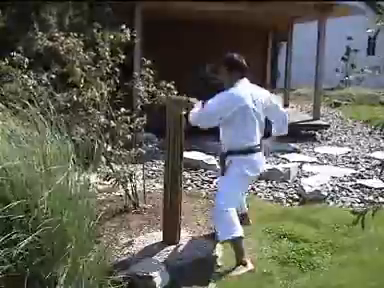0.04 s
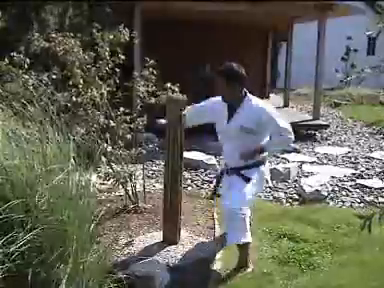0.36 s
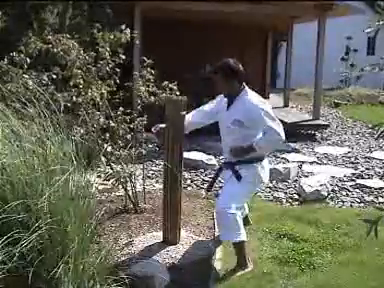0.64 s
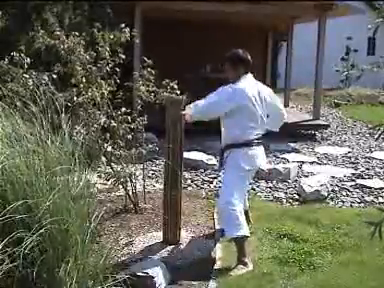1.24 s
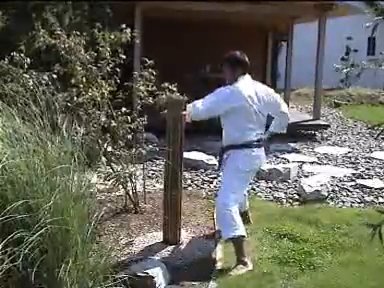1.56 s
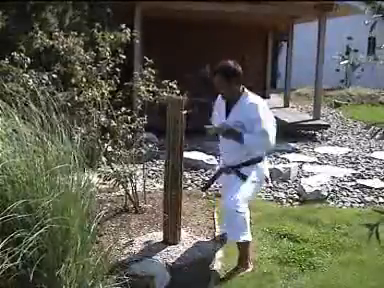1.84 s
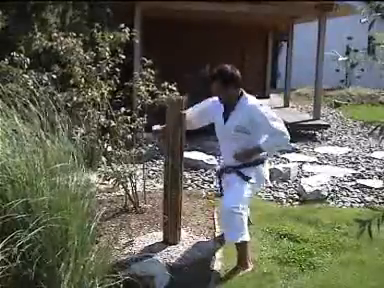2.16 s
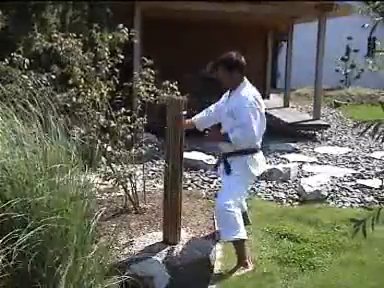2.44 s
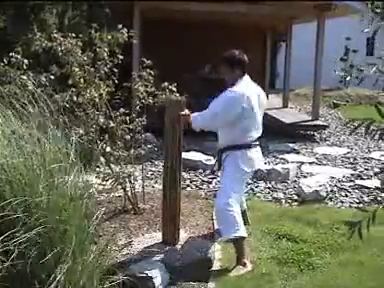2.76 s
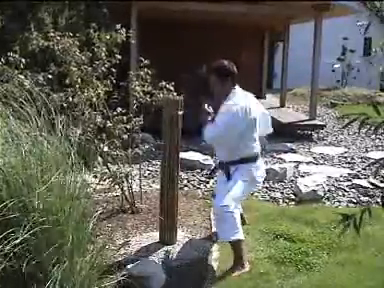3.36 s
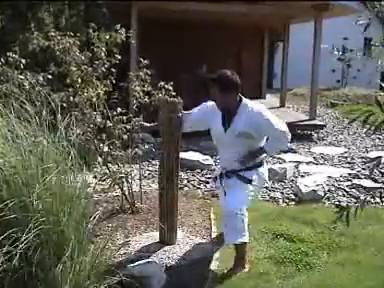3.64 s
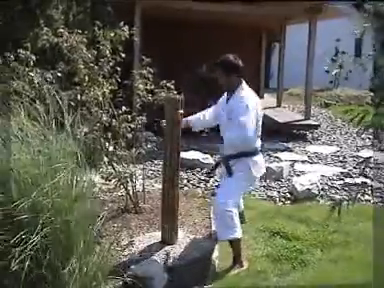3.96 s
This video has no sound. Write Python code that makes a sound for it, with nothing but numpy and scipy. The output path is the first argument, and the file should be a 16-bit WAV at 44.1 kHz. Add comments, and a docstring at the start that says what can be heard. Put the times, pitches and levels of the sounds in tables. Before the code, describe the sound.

A fist hits a wooden training post three times, each a sharp crack with a hollow knock, followed by rattling and clacking. Faint scuffs precede the blows, over a soft garden hush and slight wind on the microphone.

```python
"""A quiet garden, a small stereo camera on a wooden training post that a fist hits three times.
Each blow is a hard crack, hollow knocks of the post on its footing and a bright, crackling tail;
the post then rattles, clacks and snaps as it swings back. Feet and cloth scuff before each blow,
and light taps fall in the gaps. Behind it all lie a soft outdoor hush and a faint distant hum,
with a little wind on the microphone."""
import sys
import numpy as np
from scipy import signal
from scipy.fft import rfft, irfft
from scipy.io import wavfile
from scipy.ndimage import uniform_filter1d

SR = 44100
rng = np.random.default_rng(int(sys.argv[2]) if len(sys.argv) > 2 else 0)


def digitize_waveform(pressure):
    """Quantize a signal to 16-bit integers and store it at the path in sys.argv[1].

    Rows of a 2-D input are taken as channels; values are limited to [-1, 1].
    """
    field = np.atleast_2d(pressure).T
    bounded = np.clip(field, -1, 1)
    quanta = np.round(bounded * 32767).astype(np.int16)
    wavfile.write(sys.argv[1], SR, quanta)


N = 176400
TIME_S = np.arange(N) / SR
BIN_HZ = np.arange(N // 2 + 1) * SR / N

# spectrum of crackling wood: frequency_hz, relative_db
CRACKLE_SPECTRUM = [(30, -36.5), (300, -27), (550, -14.5), (1100, -13), (2000, -9), (3000, -4), (4200, 0.3),
                    (6000, -1), (9000, -4.5), (13300, -15), (14600, -33)]


def undb(db):
    """Decibels to gain."""
    return 10 ** (np.asarray(db) / 20)


def on_bins(points, column=1):
    """One column of a frequency table, read at every spectral line."""
    table = np.array(points, float)
    return np.interp(np.log(BIN_HZ + 1), np.log(table[:, 0]), table[:, column])


def octave_bump(hz, octaves):
    """Gain curve of one broad, steep-sided resonance, in dB."""
    away = np.log2((BIN_HZ + 1) / hz) / octaves
    return -40 * np.log10(1 + away ** 2 / 2)


def colour(x, db):
    """Causal filter shaped like this gain curve; white noise keeps its power."""
    gain = undb(db)
    cepstrum = irfft(np.log(gain / np.sqrt(np.mean(gain ** 2))), N)[:N // 2]
    cepstrum[1:] *= 2
    response = irfft(np.exp(rfft(cepstrum, N)), N)[:2048]
    return signal.oaconvolve(x, response[None], axes=1)[:, :x.shape[1]]


def cut_top(x, hz):
    """Steep low-pass filter."""
    return signal.sosfilt(signal.ellip(8, 0.2, 70, hz, fs=SR, output="sos"), x)


def noise():
    """Two unrelated noises: the direct and the diffuse part of a sound."""
    return rng.standard_normal((2, N))


def walk(rate_hz):
    """Slow random wander, spread near 1."""
    step = int(SR / rate_hz)
    return uniform_filter1d(np.repeat(rng.standard_normal(N // step + 1), step), step)[:N]


def envelope(start, attack, hold, t60):
    """Straight rise, hold, exponential fall; all times in seconds."""
    age = TIME_S - start
    fall = np.clip((age - attack - hold) / t60, 0, 2)
    return np.clip(age / attack, 0, 1) * np.exp(-np.log(1000) * fall)


def swell(at, spread):
    """A smooth rise and fall."""
    return np.exp(-0.5 * ((TIME_S - at) / spread) ** 2)


def hush(level_db=-50, wander_db=0.6):
    """Soft garden air, its level wandering slightly."""
    # spectrum of the air: frequency_hz, relative_db
    spectrum = [(18, -26), (30, -20.5), (145, -7.5), (260, -9.5), (411, -7), (683, -6), (903, -7),
                (1190, -10.5), (1750, -13.5), (7070, -18.5), (13000, -28)]
    air = colour(noise(), on_bins(spectrum)) * undb(level_db + wander_db * walk(6.86))
    return signal.sosfilt(signal.butter(20, 13000, fs=SR, output="sos"), air)


def distant_hum(waver_db=3.5, pitch_drift=0.005):
    """Faint far-off tones swell and fade, wavering in level and pitch."""
    # tones of the hum: pitch_hz, level_db, centre_s, spread_s
    tones = [(921, -60.5, 1.6, 0.9), (1018, -54.5, 3.02, 0.59), (1010, -60.5, 0.69, 1)]
    hum = np.zeros((2, N))
    for hz, db, at, spread in tones:
        level = undb(db + waver_db * walk(5.4)) * swell(at, spread)
        pitch_hz = hz * (1 + pitch_drift * walk(39.63))
        hum[0] += level * np.sin(2 * np.pi * np.cumsum(pitch_hz) / SR)  # direct part only
    return hum


def wind():
    """Puffs of wind rumble right on the microphone."""
    # spectrum of the rumble: frequency_hz, relative_db
    spectrum = [(20, -6.5), (110, -6), (220, -17.5), (2000, -89)]
    # puffs: centre_s, spread_s, level_db
    puffs = [(1.83, 0.04, -51.5), (3.2, 0.17, -54), (3.88, 0.045, -47)]
    level = sum(undb(db) * swell(at, spread) for at, spread, db in puffs)
    return colour(noise(), on_bins(spectrum)) * level


def garden_reverb(x, level_db=-24, t60_s=0.45, damping_hz=4600):
    """Shrubs and the house scatter the direct sound into a dull, short reverberation."""
    scatter = noise() * envelope(0.0017, 0.0022, 0, t60_s)
    response = signal.sosfilt(signal.butter(2, damping_hz, fs=SR, output="sos"), scatter)
    response /= np.sqrt(np.sum(response[0] ** 2))
    return undb(level_db) * signal.fftconvolve(x[:1], response, axes=1)[:, :N]


def scuffs():
    """Dull brushing as the body winds up for a blow."""
    # moves of feet and cloth: centre_s, spread_s, level_db
    moves = [(0.386, .005, -44), (1.898, 0.015, -44), (3.565, 0.0032, -40)]
    level = sum(undb(db) * swell(at, spread) for at, spread, db in moves)
    return colour(noise(), octave_bump(hz=542, octaves=0.28)) * level


def taps(low_cut_hz=610, click_t60_s=0.0092):
    """Light taps, each a small click and a short hollow ring."""
    # light contacts: start_s, ring_db, click_db
    contacts = [(.0858, -18, -26), (2.8015, -34.5, -35), (3.525, -28, -53), (3.6081, -15.5, -33)]
    # modes of a tap: pitch_hz, relative_db, t60_s
    modes = [(657, -10.5, 0.031), (793, 1, 0.0088), (1190, 0, 0.013), (2000, -14, 0.017)]
    ring = sum(undb(db + mode_db) * envelope(at, 0.0012, 0, t60) * np.sin(2 * np.pi * hz * (TIME_S - at))
               for at, db, _ in contacts for hz, mode_db, t60 in modes)
    ring = signal.sosfilt(signal.butter(10, low_cut_hz, "high", fs=SR, output="sos"), ring)
    click = sum(undb(db) * envelope(at - 0.0008, 0.001, 0, click_t60_s) for at, _, db in contacts)
    return np.array([ring, np.zeros(N)]) + colour(click * noise(), on_bins(CRACKLE_SPECTRUM))


def wood_curve():
    """The crackle spectrum lifted at the resonances of the wood, in dB."""
    # resonances: centre_hz, width_hz, lift_db
    resonances = [(1520, 240, 3), (2057, 157, 6.5), (2634, 190, 5), (3010, 80, 5), (3595, 124, 4.5),
                  (4230, 260, 1.5), (4800, 90, 1.5)]
    lift = sum(db / (1 + (2 * (BIN_HZ - hz) / width) ** 2) for hz, width, db in resonances)
    return on_bins(CRACKLE_SPECTRUM) + lift


def crackle(grains_per_s=5000, spread_db=1):
    """Dense splintery clicks over a smooth bed of equal power."""
    fires = rng.random(N) < grains_per_s / SR
    grains = fires * noise() * undb(spread_db * rng.standard_normal(N))
    return (grains / grains.std() + noise()) / np.sqrt(2)


def burst(grains, start, attack, t60, split_hz=7800, treble_t60_share=0.79):
    """Crackle that dulls as it fades, because its treble dies sooner."""
    body = signal.sosfiltfilt(signal.butter(2, split_hz, fs=SR, output="sos"), grains)
    treble = (grains - body) * envelope(start, attack, 0, t60 * treble_t60_share)
    return body * envelope(start, attack, 0, t60) + treble


def rattles(tilt_from_hz=1500):
    """Bursts of crackle as the post swings back, each brighter or duller."""
    # bursts of rattle: start_s, level_db, attack_s, t60_s, tilt_db_per_octave
    shakes = [(.484, -12, 0.0065, 0.18, -1), (0.509, -22.5, 0.0025, 0.23, 0.5),
              (.570, -37.5, 0.012, 0.87, -2), (0.616, -29.5, 0.023, 0.59, -5),
              (0.671, -35.5, 0.0068, 0.2, -4.5), (.729, -31.5, 0.013, 0.033, -4.5),
              (2.09, -17, 0.0049, 0.15, 1.5), (2.2, -19, .002, 0.23, -2), (2.231, -29, 0.019, 0.85, -4),
              (2.312, -27.5, 0.0052, 0.11, -2.5), (2.342, -16, 0.0071, 0.18, -2),
              (3.663, -13, 0.012, 0.15, 0.3), (3.7915, -23, 0.0011, 0.16, -1), (3.81, -28, 0.013, 0.99, -5),
              (3.839, -21.5, 0.011, 0.083, -1), (3.953, -15.5, 0.0017, 0.41, 1)]
    grains, wood = crackle(), wood_curve()
    octaves = np.log2(np.maximum(BIN_HZ / tilt_from_hz, 1))
    return sum(colour(undb(db) * burst(grains, at, attack, t60), wood + tilt * octaves)
               for at, db, attack, t60, tilt in shakes)


def clacks(t60_s=0.056, octaves=0.46):
    """Short dry contacts within the rattle, each ringing in one band."""
    # dry contacts: start_s, level_db, pitch_hz
    contacts = [(0.664, -19.5, 4100), (.674, -24, 2620), (0.847, -37, 3460), (0.8607, -34, 3880),
                (2.211, -22.5, 2280), (2.258, -17.5, 3070), (2.574, -40, 3900), (3.8985, -20, 4280)]
    hiss = noise()
    return sum(colour(undb(db) * envelope(at, 0.00033, 0, t60_s) * hiss, octave_bump(hz, octaves))
               for at, db, hz in contacts)


def snaps():
    """The post slaps its backing with brief, bright snaps that stand out of the rattle."""
    # slaps: start_s, level_db, t60_s
    slaps = [(.643, -31, 0.056), (2.2018, -20.5, 0.047), (2.274, -26.5, 0.048), (2.377, -40, .025),
             (3.792, -29, 0.028), (3.8494, -22, 0.027)]
    level = sum(undb(db) * envelope(at, 0.00049, 0.0004, t60) for at, db, t60 in slaps)
    return colour(crackle() * level, octave_bump(hz=6700, octaves=0.93))


def knocks(favoured_db=6.5):
    """Damped thumps of the post on its footing, left and right; each lifts the modes near one pitch."""
    # contacts with the footing: start_s, level_db, left_minus_right_db, favoured_hz
    contacts = [(0.4342, -10.5, -4, 850), (0.4396, -21.5, 0, 120), (.490, -22.5, 1, 800),
                (2.037, -11, -2, 700), (2.0387, -12, -2, 1230), (2.0488, -17.5, 3, 656),
                (3.618, -14, 5, 390), (3.6235, -10, 11, 390)]
    # modes of the post: pitch_hz, relative_db, t60_s
    modes = [(107, -5.5, 0.022), (395, -7.5, 0.02), (680, -9.5, 0.013), (829, -11, 0.031),
             (1280, -9, 0.025)]
    stereo = np.zeros((2, N))
    for at, db, pan_db, favoured_hz in contacts:
        gains = undb([[db + pan_db / 2], [db - pan_db / 2]])
        for hz, mode_db, t60 in modes:
            lift_db = favoured_db * np.exp(-(np.log2(hz / favoured_hz) / 0.5) ** 2)
            ring = envelope(at - 0.0003, 0.00014, 0, t60) * np.cos(2 * np.pi * hz * (TIME_S - at))
            stereo += gains * undb(mode_db + lift_db) * ring
    return stereo


def blows(touch_lead_s=0.0027, touch_db=-14, crack_t60_s=0.028):
    """A touch of the knuckles, a broad crack while the fist is in contact, and a crackling tail."""
    # punches: start_s, crack_db, contact_s, tail_db, tail_t60_s
    punches = [(0.4343, -9.5, 0.003, -9, 0.28), (2.0361, -9, 0.005, -10.5, 0.47),
               (3.6142, -12.5, 0.0081, -10.5, 0.43)]
    # spectrum of the crack: frequency_hz, relative_db
    spectrum = [(30, 1), (120, -5.5), (250, -6), (400, -3.5), (800, 3), (1000, -0.5), (1500, 4.5),
                (3500, 4.5), (6000, -8), (10000, -10.5), (15000, -11.5)]
    grains = crackle()
    crack_level, tail = np.zeros(N), np.zeros((2, N))
    for at, crack_db, contact_s, tail_db, tail_t60_s in punches:
        touch = undb(touch_db) * envelope(at - touch_lead_s, 0.0018, 0, 0.052)
        impact = envelope(at, 0.000043, contact_s, crack_t60_s)
        crack_level += undb(crack_db) * (touch + impact)
        tail += undb(tail_db) * burst(grains, at, 0.0016, tail_t60_s)
    return colour(crack_level * noise(), on_bins(spectrum)) + colour(tail, wood_curve())


def microphone_pair(x):
    """Direct and diffuse sound to left and right: the bass spreads wide, the treble stays central."""
    # stereo image: frequency_hz, left_minus_right_db, left_lag_rad, diffuse_db
    image = [(60, 8, 2.2, 13.5), (202, 12.5, 3.5, -2.5), (403, 28, 1.7, -2), (780, 8, 2.04, -6),
             (1310, 2.5, 2, -6.5), (2520, -2, 0.93, -8.5), (4400, -2, 0.43, -10), (8000, 0, 0.3, -9),
             (15500, 0, 0.2, -35)]
    pan_db, lag_rad, diffuse_db = (np.repeat(on_bins(image, column), 2)[:N + 1] for column in (1, 2, 3))
    direct, diffuse = rfft(x, 2 * N)
    left_over_right = undb(pan_db) * np.exp(-1j * lag_rad)
    side = direct * (left_over_right - 1) / (left_over_right + 1) + diffuse * undb(diffuse_db)
    return irfft(np.array([direct + side, direct - side]), 2 * N)[:, :N]


def scene():
    """The post, its reverberation and the garden air, as they reach the microphones."""
    rebound = cut_top(rattles() + clacks() + snaps(), hz=14100)
    post = blows() + rebound + taps()
    garden = post + garden_reverb(post) + scuffs() + hush() + distant_hum() + wind()
    return knocks() + microphone_pair(garden)


def record(dry):
    """The camera rounds the loudest peaks and cuts the top."""
    ceiling = 0.87
    return cut_top(ceiling * np.tanh(dry / ceiling), hz=15150)


dry = scene()
out = record(dry)
digitize_waveform(out)
```